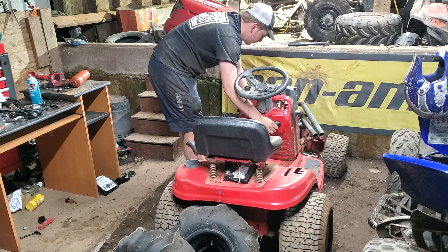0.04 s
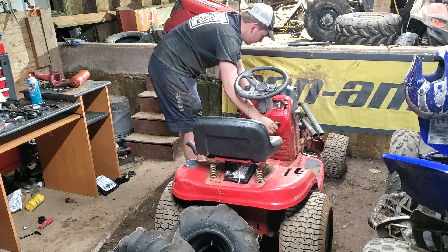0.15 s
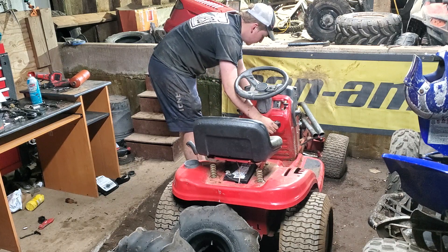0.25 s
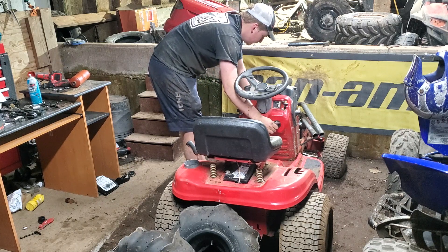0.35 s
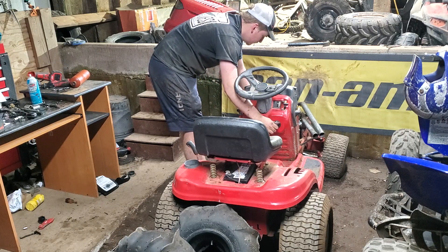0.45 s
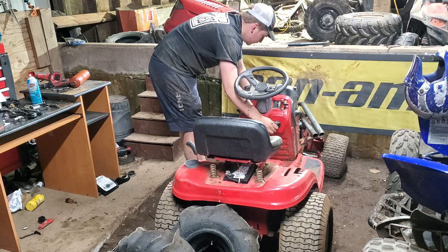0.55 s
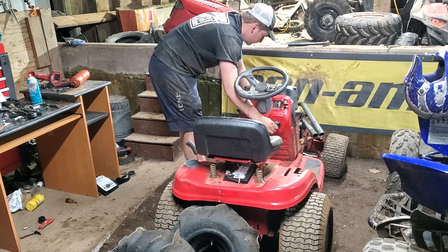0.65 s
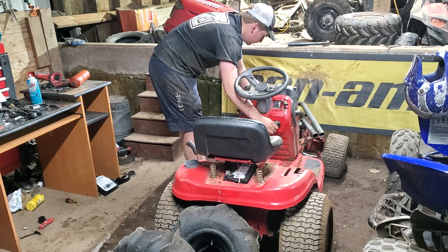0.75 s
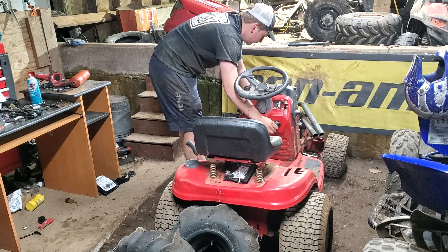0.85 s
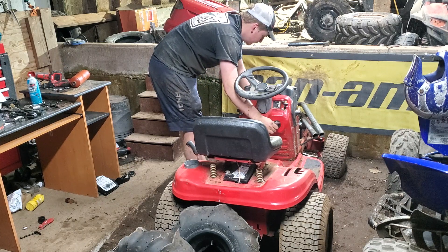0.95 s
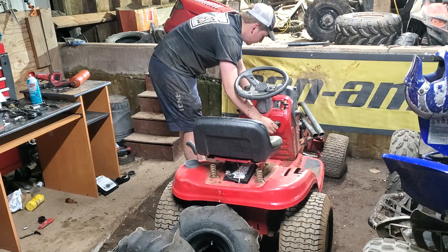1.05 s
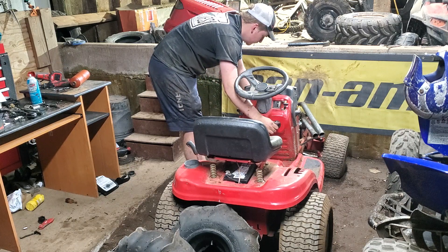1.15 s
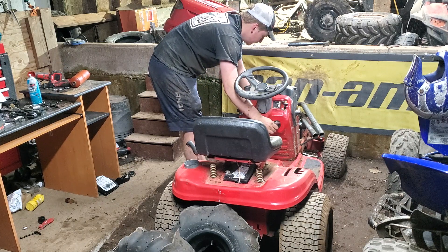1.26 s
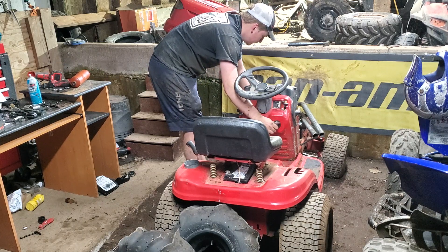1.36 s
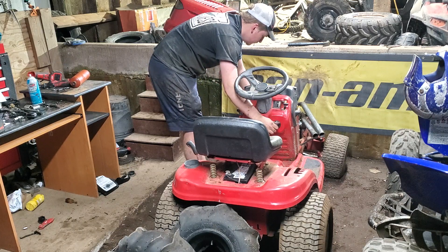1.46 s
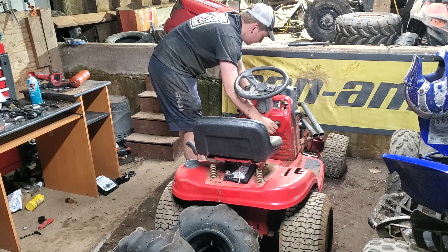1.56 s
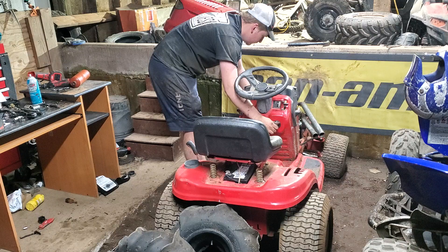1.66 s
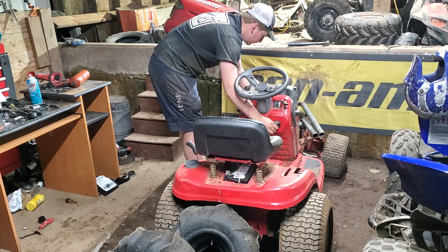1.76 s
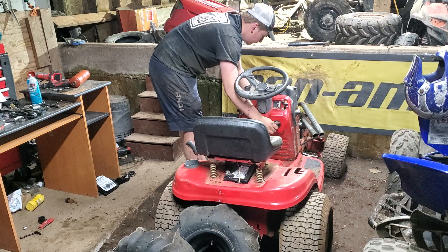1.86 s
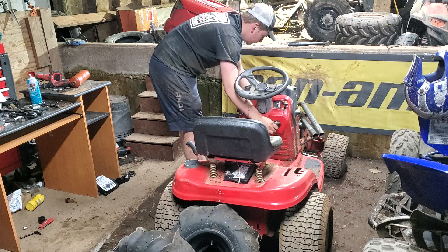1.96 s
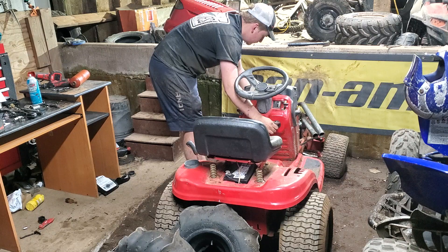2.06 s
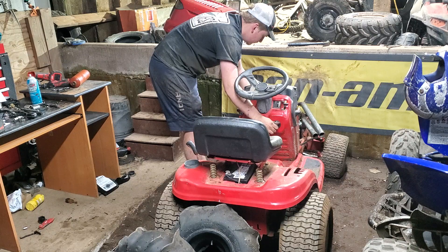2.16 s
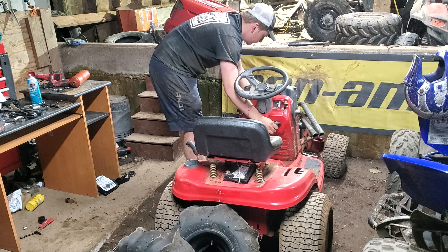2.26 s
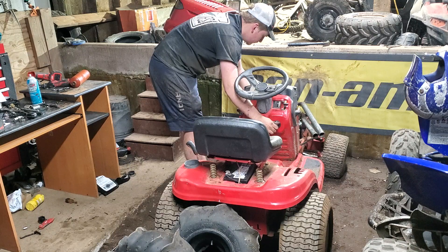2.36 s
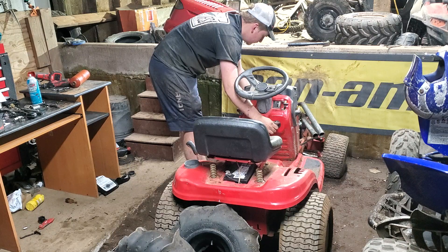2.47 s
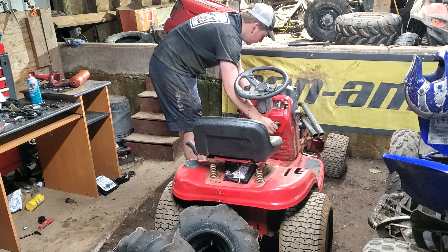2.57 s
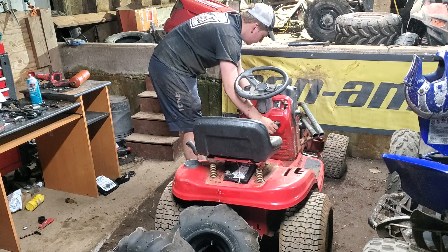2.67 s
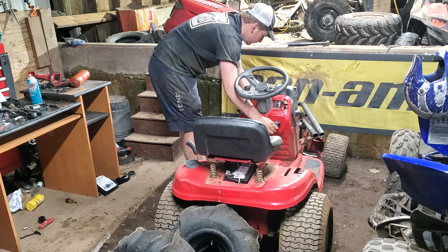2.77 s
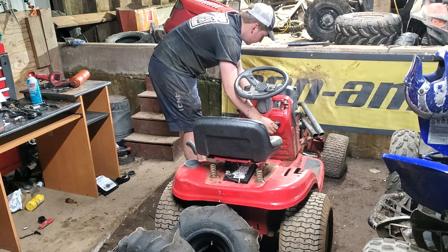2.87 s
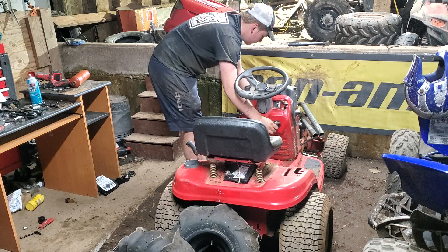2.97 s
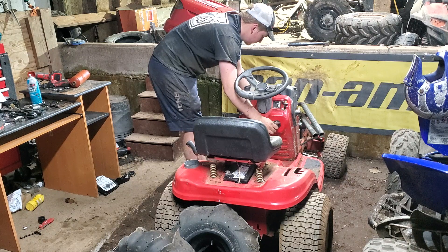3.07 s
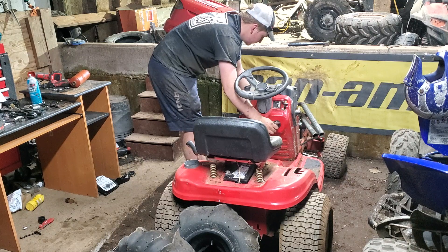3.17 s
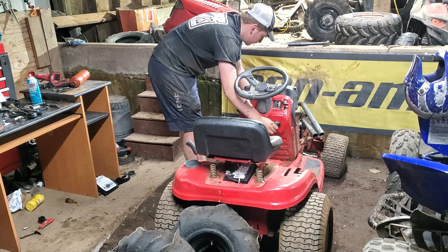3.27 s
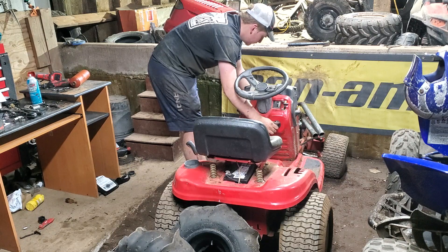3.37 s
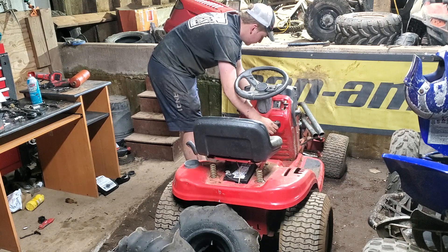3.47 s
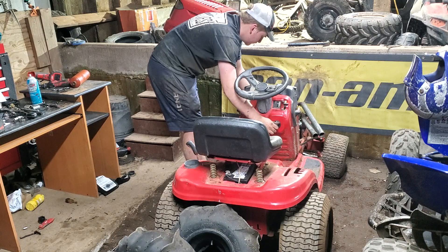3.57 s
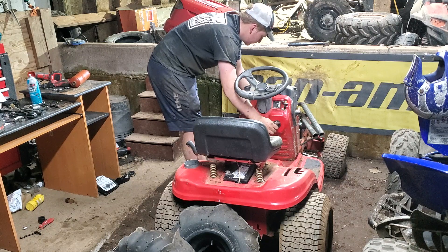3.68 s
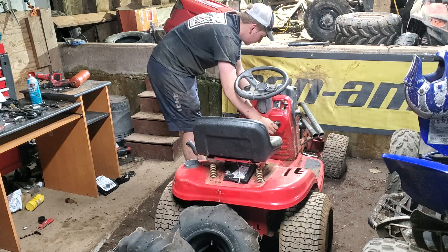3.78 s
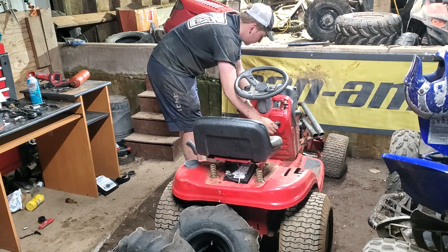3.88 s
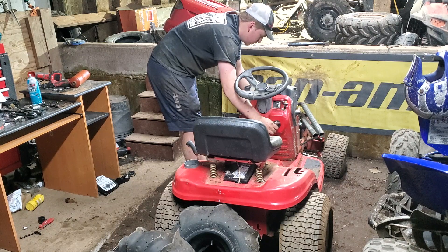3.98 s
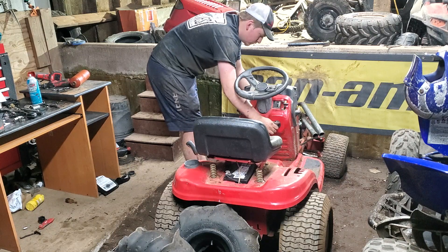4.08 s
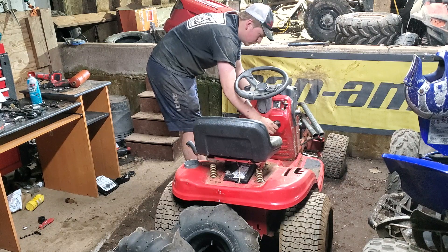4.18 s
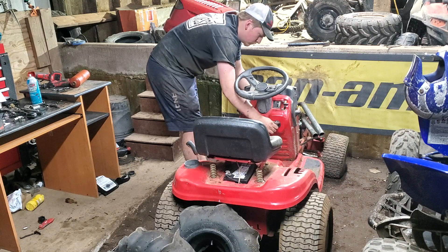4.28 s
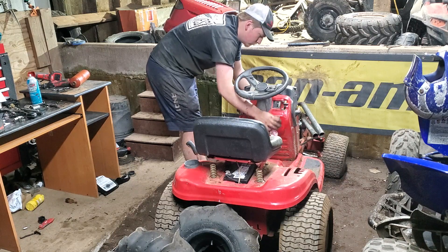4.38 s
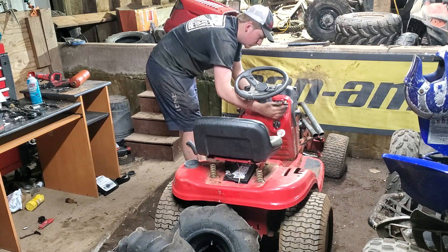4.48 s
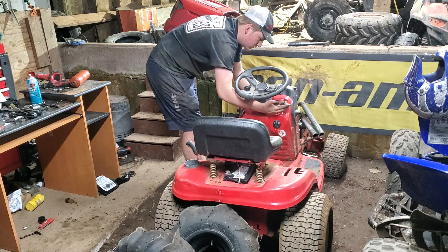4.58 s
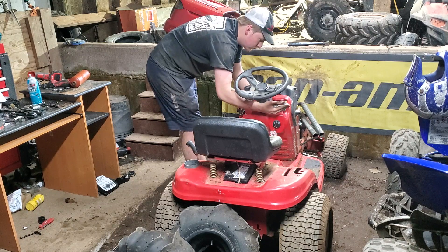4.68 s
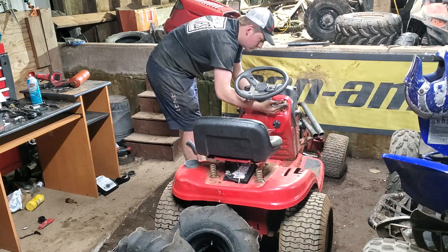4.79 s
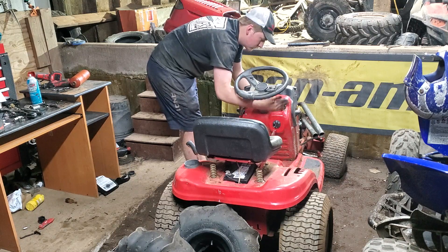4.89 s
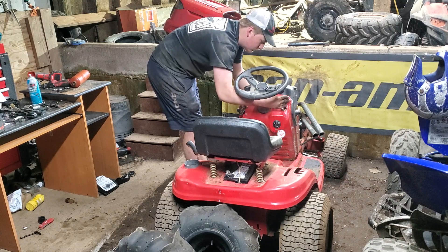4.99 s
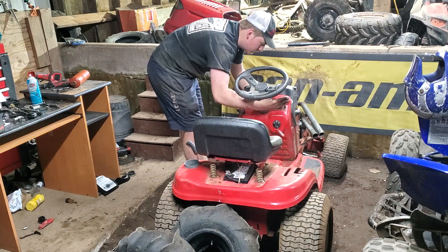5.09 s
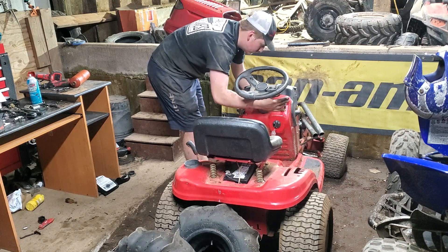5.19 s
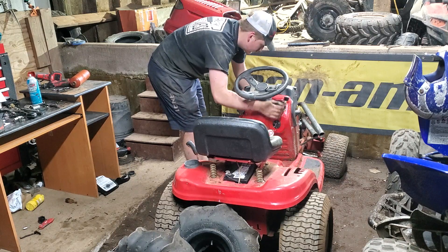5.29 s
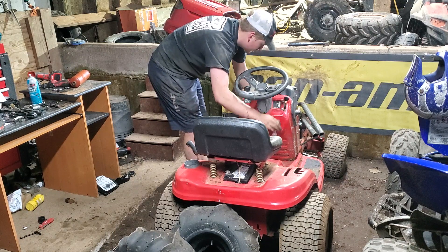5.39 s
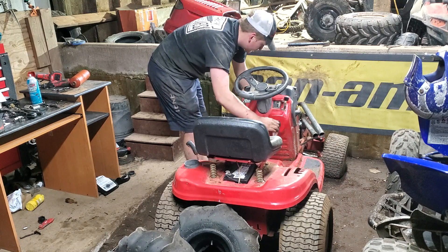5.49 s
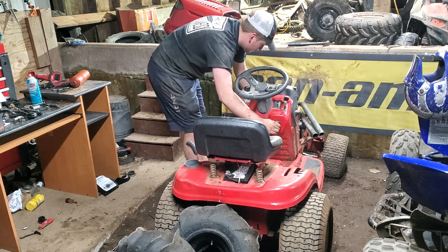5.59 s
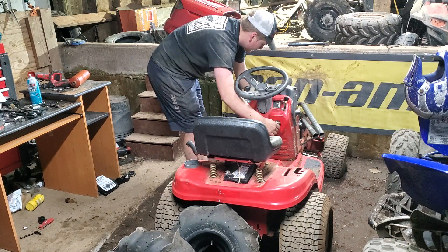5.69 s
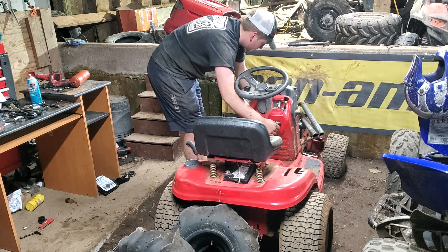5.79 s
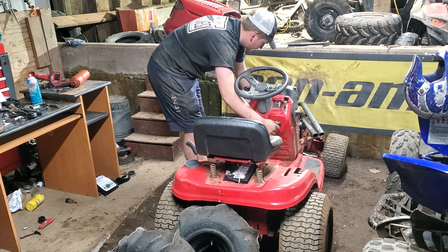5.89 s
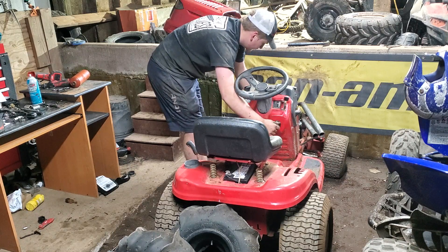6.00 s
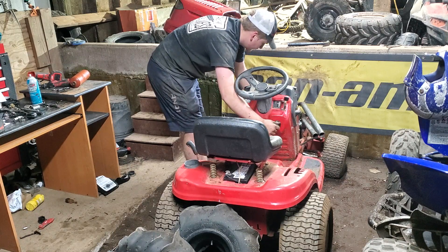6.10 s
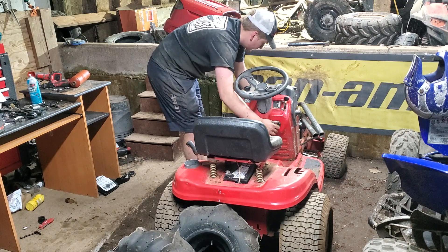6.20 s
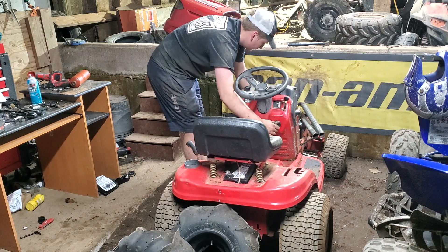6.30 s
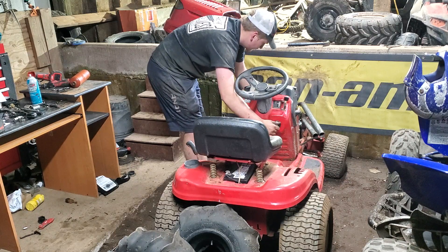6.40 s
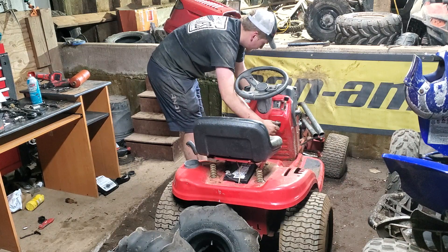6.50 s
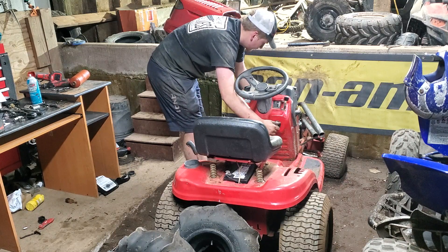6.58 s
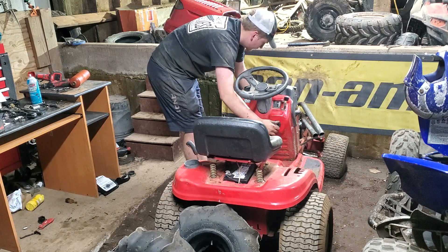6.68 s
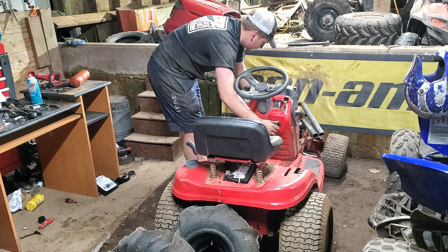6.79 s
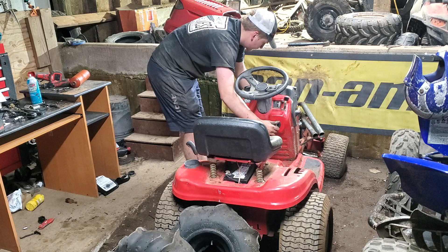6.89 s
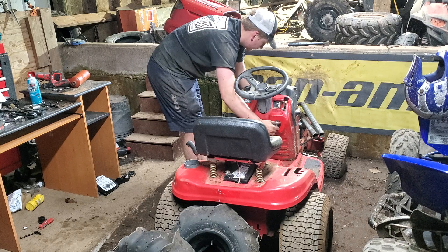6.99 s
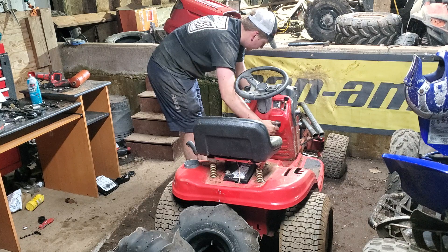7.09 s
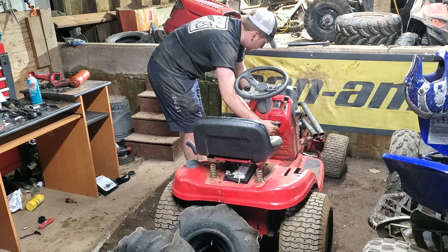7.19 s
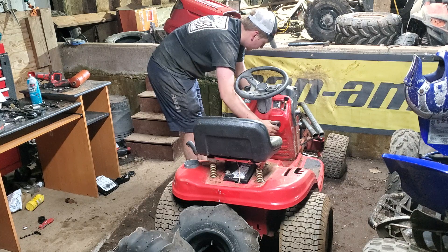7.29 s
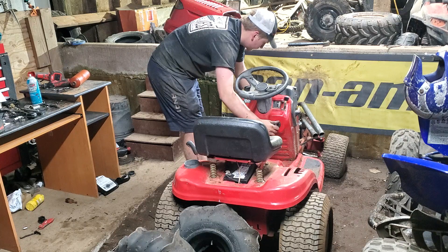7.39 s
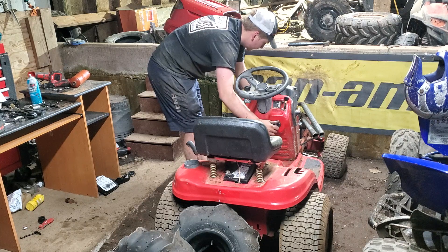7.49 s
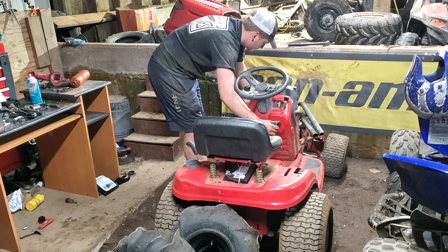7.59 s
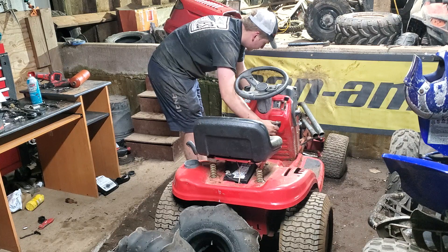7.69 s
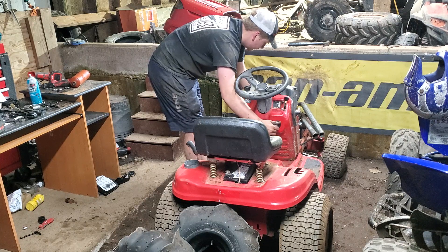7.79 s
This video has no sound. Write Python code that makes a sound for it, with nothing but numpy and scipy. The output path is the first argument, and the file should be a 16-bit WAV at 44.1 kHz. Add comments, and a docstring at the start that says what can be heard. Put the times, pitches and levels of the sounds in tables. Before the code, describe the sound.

From 0 s an electric starter cranks a ride-on mower's single-cylinder engine in a workshop. A rough, wobbling whine near 950 Hz and gritty metallic grinding surge about 5.5 times a second, dipping as the gear runs free, with a low thump and a tiny spit of air at each exhaust stroke. Sharp pops crack at about 0.5 and 0.7 s, with faint ones at 0.9 and 1.8 s. Cranking slows slightly around 2.9 s, then recovers; short sagging intake honks pulse from 3.2 to 4.4 s. The starter is released at 4.4 s and the grind falls away quickly into short wheezes, small clinks and dull knocks, the strongest at 5.1 s. Airy, hissy exhaust coughs follow at 5.6 (faint), 5.75, 6.25, 6.45, 6.75, 7.1, 7.35 and 7.8 s, over a very faint steady background. Stereo microphones catch a short, diffuse room ring.

```python
"""In a workshop, an electric starter cranks the single-cylinder engine of a ride-on mower.
Its gear whines (wobbling tones) and grinds (tooth strikes and noise that ring the casing).
The exhaust thumps once a cycle (pushes into low modes), the intake honks (short sagging tones),
and charges pop, two loudly and two faintly (noise bursts and rings), but the engine will not run.
The starter is let go, the crank rocks to rest, and the exhaust coughs airily (bursts of hiss)."""
import sys
import numpy as np
from scipy import signal
from scipy.fft import rfft, irfft, next_fast_len
from scipy.io import wavfile

SR = 44100
rng = np.random.default_rng(int(sys.argv[2]) if len(sys.argv) > 2 else 0)


def put_to_file(sound):
    """Save the sound as 16-bit audio at rate SR, in the file named by the first command-line argument."""
    columns = np.atleast_2d(sound).T  # one column per channel
    safe = np.clip(columns, -1, 1)
    whole_steps = np.round(safe * 32767)
    wavfile.write(sys.argv[1], SR, whole_steps.astype(np.int16))


N = 346175
TIME = np.arange(N) / SR

# Levels in the tables are starting levels, before the mixing and the room.
# cranking speed, one engine cycle being two turns of the crank: time_s, speed_cycles_per_s
CRANK_SPEED = [(0.0, 5.549), (0.2, 5.605), (0.73, 6.03), (0.9, 5.633), (1.63, 5.399), (1.87, 5.466),
               (2.92, 5.212), (3.62, 5.466), (4.4, 5.517), (4.96, 0.0)]
# how often the teeth of the starter gear meet: time_s, mesh_hz
MESH_RATE = [(0, 993), (.5, 982), (.62, 1003), (.87, 1018), (1.1, 985), (1.35, 945), (1.65, 935),
             (2.1, 960), (2.4, 938), (2.85, 915), (3.2, 932), (3.7, 968), (4.4, 974)]
# one engine cycle, from the exhaust stroke on: share_of_cycle, relative_speed, gear_load_db
CYCLE = [(0, 1.0, 6), (.12, 1.0, 6), (.25, 1.0, 3), (.38, 1.0, -2), (.56, 1.0, 5.5), (.71, 1.018, 6.5),
         (.78, .99, -2), (.83, .86, 0.5), (.91, .84, -2), (.96, .99, 2.5), (1, 1.0, 5)]
# panels that the whine sets ringing: pitch_hz, width_hz, level_db
PANELS = [(942, 18, 0.5), (990, 13, 2.5)]
# rough bands of gear noise that move with the mesh: multiple_of_mesh, half_width_hz, level_db
GEAR_BANDS = [(1.73, 35, -20), (1.87, 35, -14.5), (2.78, 60, -18), (2.98, 60, -15), (3.9, 150, -18)]
# ringing of the engine casing and covers: pitch_hz, width_hz, relative_level_db
CASING = [(631.7, 10, 0.5), (703, 34, -1), (815, 15, 2.5), (900, 8.6, 8.5), (940, 5.7, 7), (1140, 20, -10),
          (1240, 18, -17), (1271, 25, 3.5), (1602, 28, -2.5), (1704, 28, -4), (1793, 28, -1.5),
          (1920, 42, -12.5), (2660, 50, -7), (2886, 50, -6.5)]
# exhaust thump, with the low modes of the workshop: pitch_hz, level_db, t60_s (time to fall 60 dB)
THUMP_MODES = [(94, 2, 0.13), (66, -12, .37), (104.2, -5, 0.45), (112, -10, 0.52)]
# times when the throttle is held open: start_s, end_s
THROTTLE_OPEN = [(0.05, 0.2), (1.85, 2.0), (3.15, 4.6)]
# charges that fire in the exhaust: start_s, crack_db, boom_db, stroke_boost_db, ring_hz, ring_db
POPS = [(0.535, -10, -16.5, 9, 3900, -29), (0.707, -14.5, -28, 7, 3550, -22),
        (0.875, -23.5, -40.5, 1.7, 3550, -42), (1.784, -32.5, -46, 1.5, 3550, -46)]
# shell of the muffler, struck by a pop: pitch_hz, width_hz, relative_level_db
MUFFLER_SHELL = [(1250, 120, 5.5), (1790, 50, -1.5), (2060, 95, -3.5), (3120, 40, -3.5), (5800, 110, -3),
                 (6600, 110, -2)]
# coughs of the exhaust: start_s, length_s, hiss_db, low_body_db, ring_hz, ring_db
COUGHS = [(5.584, 0.049, -48, -56.5, 3490, -60), (5.747, 0.065, -37.5, -34.5, 1720, -54),
          (6.245, 0.062, -41, -41, 1700, -45), (6.454, 0.029, -37, -36.5, 4100, -53),
          (6.745, 0.033, -40, -40, 5030, -54), (7.074, 0.036, -40.3, -36, 4420, -59),
          (7.355, 0.034, -38, -33, 4040, -50), (7.797, .06, -37.3, -35.5, 3450, -44)]
# ringing of the exhaust pipe in a cough: pitch_hz, width_hz, level_db
PIPE = [(890, 30, -7), (1290, 30, -4), (1600, 30, -5), (1780, 6.2, 2), (2900, 90, -6), (3950, 58, -4),
        (5300, 30, 2)]
# air wheezing past the valves as the crank rocks to rest: start_s, length_s, level_db
WHEEZES = [(4.43, 0.093, -37.5), (4.587, 0.016, -40.5), (4.645, 0.05, -50), (4.798, 0.046, -48.5),
           (4.932, 0.12, -52.5)]
# dull knocks as the machine settles: start_s, length_s, level_db
KNOCKS = [(4.819, 0.021, -49), (4.928, 0.019, -50.5), (5.077, 0.052, -38.8)]
# loose metal that clinks as the crank rocks to rest: start_s, pitch_hz, level_db
RATTLES = [(4.592, 6630, -40), (4.655, 1900, -46), (4.807, 3450, -44), (4.835, 2150, -50),
           (5.008, 2870, -47), (5.018, 3400, -51)]
# tone colour of the grinding gears: pitch_hz, level_db (per Hz)
GRIND_COLOUR = [(25, -55), (70, -14), (170, -10.5), (400, -9), (520, -7), (750, -6.5), (1100, -1.5),
                (1450, -5.5), (1800, -7), (2300, -7), (2850, -8), (3400, -8), (4000, -9.5), (6500, -17.5),
                (7600, -28.5), (10500, -26.5), (12500, -29.5), (16000, -35.5)]
# tone colour of the crack of a pop: pitch_hz, level_db (per Hz)
CRACK_COLOUR = [(30, -36), (150, -12.5), (1200, -3), (2000, -0.5), (3800, 7), (4700, -4), (6700, -5),
                (7800, -19), (11000, -10.5), (16000, -16)]
# tone colour of the boom of a pop: pitch_hz, level_db (per Hz)
BOOM_COLOUR = [(30, -40.5), (200, -15), (420, -7.5), (620, -2), (750, -2), (1000, -9.5), (3000, -28.5),
               (16000, -59.5)]
# tone colour of the hiss of a cough: pitch_hz, level_db (per Hz)
HISS_COLOUR = [(30, -50), (130, -13), (300, -15), (500, -1), (950, 2), (1150, -2), (1700, 0.5),
               (2200, -5.5), (2900, -5.5), (3500, -7), (4100, -9.5), (4600, -10.5), (6300, -18.5),
               (8000, -36.5), (11000, -31), (16000, -41)]
# tone colour of the low body of a cough: pitch_hz, level_db (per Hz)
BODY_COLOUR = [(25, -55), (90, -15.5), (170, -12.5), (330, 0.5), (520, -3), (800, -6.5), (1300, -8),
               (2000, -16.5), (4000, -44), (9000, -43), (16000, -56)]
# tone colour of the air at the valves: pitch_hz, level_db (per Hz)
WHEEZE_COLOUR = [(30, -32.5), (300, 7), (900, 2.5), (1500, -3), (3200, 1), (4500, -4), (6500, -13.5),
                 (7700, -22), (11000, -13), (16000, -22.5)]
# tone colour of the knocks: pitch_hz, level_db (per Hz)
KNOCK_COLOUR = [(30, -26), (110, -5), (220, -3), (340, 1), (550, -8), (800, -15), (1500, -22), (4000, -35),
                (16000, -73)]
# tone colour of the steady background noise: pitch_hz, level_db (per Hz)
FLOOR_COLOUR = [(25, -1), (60, 10), (110, 5.5), (250, -5), (800, -7), (1600, -14), (4000, -20.5),
                (7000, -33.5), (16000, -22.5)]
# how long the workshop rings: pitch_hz, t60_s
ROOM_T60 = [(100, 0.9), (300, 0.45), (800, 0.5), (1800, 0.4), (5000, 0.32), (13000, 0.21)]
# difference between the microphones: pitch_hz, left_minus_right_db
MIC_BALANCE = [(60, 1), (110, 1.5), (200, -0.5), (380, -1), (700, -3), (1290, 0.5), (2380, 1.5),
               (4400, 2.5), (8120, -4.5), (15000, -11.5)]

FIRST_STROKE_S, USUAL_CYCLES_PER_S, TEETH_PER_CYCLE = 0.0035, 5.5, 176
# the starter is let go; the faint noise of the coasting valve gear holds a little longer
RELEASE_S, COAST_END_S = 4.41, 5.05
# whine at the usual speed before load and panels, gain per extra cycle per second, fall after release
WHINE_DB, WHINE_SPEED_DB, WHINE_FALL_S = -36, 9.5, 0.051
# grinding at the usual speed before load, its fall, and the valve gear noise lying under it
GRIND_DB, GRIND_FALL_S, COAST_DB, COAST_FALL_S = -27.2, 0.056, -63, 0.036
# the harder the starter labours, the more its gears grind: gain for each cycle per second lost
LABOUR_DB = 3
# exhaust stroke at the usual speed; its strength follows speed to this power
STROKE_DB, STROKE_SPEED_POWER = -20.5, 0.5
# an intake gulp: its point in the cycle, level at the usual speed before honk and rasp, power of speed
GULP_SHARE, GULP_DB, GULP_SPEED_POWER = 0.74, -29, 1.5
# longer coughs sizzle more: level at the usual length, gain per second longer
SIZZLE_DB, SIZZLE_DB_PER_S, USUAL_COUGH_S = -63.5, 380, 0.05
# the low body of a cough comes a moment after its hiss
BODY_LAG_S = 0.0176
# hollow resonance of the muffler, sounded by the body of a cough
MUFFLER_HZ, MUFFLER_WIDTH_HZ, MUFFLER_DB = 343, 45, -11
# after the last knock the chassis shudders softly, each shudder a little louder than the one before
SHUDDER_AFTER_S, SHUDDER_EVERY_S, SHUDDER_S, SHUDDER_DB, SHUDDER_GAIN_DB = 0.18, 0.078, 0.016, -60, 2
FLOOR_DB, MIC_SPACING_M, CUTOFF_HZ = -72, 0.13, 15900


def gear_whine(teeth, load_db, second_db=-9, third_db=-13, wobble=.4, backlash=.65, flicker_db=3):
    """The mesh tone, rough from an off-centre pinion and tooth play, flares as it crosses panel modes."""
    level_db = WHINE_DB + WHINE_SPEED_DB * (starter_speed() - USUAL_CYCLES_PER_S)
    mesh_angle = 2 * np.pi * teeth
    pinion = mesh_angle / 16  # 16 teeth to a turn
    angle = mesh_angle + wobble * np.sin(pinion) + backlash * drift(49)
    tone = np.sin(angle)
    tone = tone + from_db(second_db) * np.sin(2 * angle) + from_db(third_db) * np.sin(3 * angle)
    tone = rms_one(tone * (1 + wobble * np.cos(pinion)) * from_db(flicker_db * drift(22)))
    tone = tone + ringing(tone, PANELS)
    return tone * from_db(level_db + load_db) * gate(0, RELEASE_S, WHINE_FALL_S, 0.0013)


def grinding(teeth, load_db, uneven_db=5.5, rub=.5, load_share=0.55, ring_db=5, rattle_db=2.0):
    """Every tooth strikes with its own force and rubs; the casing rings and rattles with it."""
    driven_db = GRIND_DB + LABOUR_DB * (USUAL_CYCLES_PER_S - starter_speed())
    driven = from_db(driven_db) * gate(0, RELEASE_S, GRIND_FALL_S, .001)
    coasting = from_db(COAST_DB) * gate(0, COAST_END_S, COAST_FALL_S, .001)

    tooth_meets = np.diff(np.floor(teeth), prepend=0)
    tooth_force = from_db(uneven_db * np.clip(rng.standard_normal(N), -2, 2))
    strikes = tooth_meets * tooth_force * rng.choice([-1, 1], N)
    bands = sum(from_db(db) * narrow_noise(multiple * teeth, half_width)
                for multiple, half_width, db in GEAR_BANDS)
    force = rms_one(strikes) + rub * rng.standard_normal(N) + bands
    force = force * from_db(rattle_db * drift(40))
    rings = from_db(ring_db) * ringing(force, CASING)
    # the load sways the grinding less than the whine
    return colour(force + rings, GRIND_COLOUR) * (driven + coasting) * from_db(load_share * load_db)


def exhaust(opening_s=0.01, lag_s=0.0023, low_cut_hz=50):
    """The valve lets out a soft push of air that sets the low modes swinging."""
    pushes = np.zeros(N)
    for start_s, db in exhaust_strokes():
        pushes[int(max(start_s + lag_s, 0) * SR)] = from_db(db)
    age = TIME[:SR // 2]
    swing = sum(from_db(db) * np.sin(2 * np.pi * hz * age) * np.exp(-np.log(1000) * age / t60)
                for hz, db, t60 in THUMP_MODES)
    opening = np.sin(np.pi * np.minimum(age / opening_s, 1)) ** 2
    thump = signal.fftconvolve(swing, opening / opening.sum())
    return filtered(-signal.fftconvolve(pushes, thump)[:N], low_cut_hz, "high", order=6)


def wall_echo(x, delay_s=.048, db=-15):
    """The far wall throws the thump back."""
    return x + from_db(db) * np.interp(TIME - delay_s, TIME, x, left=0)


def intake(honk_hz=262, sag=0.13, length_s=0.04, honk_db=1, rasp_db=0.5, rasp_hz=760,
           rasp_width_hz=320, lead_s=0.0084, flutter=0.28):
    """Each gulp sounds the inlet tract, sagging in pitch around honk_hz, with a rasp of rushing air."""
    honk, flow = np.zeros(N), np.zeros(N)
    for start_s, db in gulps():
        age = TIME - start_s + lead_s
        on = (age > 0) & (age < length_s)
        stroke = age[on] / length_s
        flow[on] = from_db(db) * np.sin(np.pi * stroke)
        honk[on] = flow[on] * np.sin(2 * np.pi * honk_hz * age[on] * (1 + sag * (1 - stroke)))
    rasp = rms_one(resonance(rng.standard_normal(N), rasp_hz, rasp_width_hz))
    return from_db(honk_db) * honk * (1 + flutter * drift(90)) + from_db(rasp_db) * flow * rasp


def pops(crack_fall_s=0.0047, crack_rise_s=0.001, boom_s=0.0064, boom_fall_s=0.013, boom_rise_s=0.0016,
         shock_db=-4, shock_lag_s=.003, ring_s=.008, ring_fall_s=.016, ring_half_width_hz=170):
    """A burning charge cracks and booms; its shock strikes the muffler, and the pipe rings on brightly."""
    crack, boom, shell, rings = 0, 0, 0, 0
    for start_s, crack_db, boom_db, _, ring_hz, ring_db in POPS:
        shock_s = start_s + shock_lag_s
        crack = crack + from_db(crack_db) * gate(start_s, crack_fall_s, crack_fall_s, crack_rise_s)
        boom = boom + from_db(boom_db) * gate(start_s, boom_s, boom_fall_s, boom_rise_s)
        for hz, width, db in MUFFLER_SHELL:
            shell = shell + ping(shock_s, hz, crack_db + shock_db + db, 1 / (np.pi * width))
        ring_gate = gate(shock_s, ring_s, ring_fall_s, crack_rise_s)
        rings = rings + from_db(ring_db) * ring_gate * np.sin(2 * np.pi * ring_hz * TIME)
    bursts = crack * noise(CRACK_COLOUR) + boom * noise(BOOM_COLOUR)
    return bursts + .5 * shell + rings * drift(ring_half_width_hz)


def coughs(chiff_hz=2820, chiff_half_width_hz=110, chiff_db=-7, chiff_s=0.012,
           ring_half_width_hz=110, ring_fall_s=0.026, turbulence_db=1.5):
    """A chiff opens a hiss that rings in the pipe; a hollow body, a sizzle and a pitched ring join in."""
    hiss, body, sizzle, chiff, own_ring = 0, 0, 0, 0, 0
    flutter = drift(ring_half_width_hz)
    for start_s, length, hiss_db, body_db, ring_hz, ring_db in COUGHS:
        sizzle_db = SIZZLE_DB + SIZZLE_DB_PER_S * (length - USUAL_COUGH_S)
        late = gate(start_s + BODY_LAG_S, length - BODY_LAG_S, 0.027, 0.0053)
        ring_gate = gate(start_s, length, ring_fall_s, 0.013)
        hiss = hiss + from_db(hiss_db) * gate(start_s, length, 0.017, 0.0038)
        chiff = chiff + from_db(hiss_db + chiff_db) * gate(start_s, chiff_s, 0.0092, 0.0023)
        own_ring = own_ring + from_db(ring_db) * ring_gate * np.sin(2 * np.pi * ring_hz * TIME)
        body = body + from_db(body_db) * late
        sizzle = sizzle + from_db(sizzle_db) * late
    hiss = hiss * noise(HISS_COLOUR) * from_db(turbulence_db * drift(70))
    rings = ringing(hiss, PIPE) + own_ring * flutter
    bright = rms_one(filtered(rng.standard_normal(N), 8000, "high"))
    body = body * noise(BODY_COLOUR)
    hollow = from_db(MUFFLER_DB) * resonance(body, MUFFLER_HZ, MUFFLER_WIDTH_HZ)
    chiff = chiff * narrow_noise(TIME * chiff_hz, chiff_half_width_hz)
    return hiss + rings + body + hollow + sizzle * bright + chiff


def valve_air(spit_db=-25.5, spit_s=0.0086, spit_hz=5000):
    """Air spits brightly at every exhaust stroke, and wheezes slowly once the starter is let go."""
    spits = sum(from_db(db + spit_db) * gate(s, spit_s, .008, .004) for s, db in exhaust_strokes())
    wheezes = sum(from_db(db) * gate(s, length, 0.017, 0.0056) for s, length, db in WHEEZES)
    air = noise(WHEEZE_COLOUR)
    return wheezes * air + spits * filtered(air, spit_hz, "high")


def knocks(count=2, fall_s=0.019, knock_rise_s=0.0015, shudder_rise_s=0.012):
    """Dull, short knocks as the machine settles, the last a heavy thud as the piston kicks back, and softer
    shudders after it."""
    blows = sum(from_db(db) * gate(s, length, fall_s, knock_rise_s) for s, length, db in KNOCKS)
    first_s = KNOCKS[-1][0] + SHUDDER_AFTER_S
    shudders = 0
    for k in range(count):
        shape = gate(first_s + k * SHUDDER_EVERY_S, SHUDDER_S, fall_s, shudder_rise_s)
        shudders = shudders + from_db(SHUDDER_DB + k * SHUDDER_GAIN_DB) * shape
    return noise(KNOCK_COLOUR) * (blows + shudders)


def rattles(count=3, loss_db=3, fall_s=.0035):
    """Each loose piece clinks a few times as it bounces, weaker and at a slightly different pitch."""
    clinks = 0
    for start_s, hz, db in RATTLES:
        for k in range(count):
            bounce_s = start_s + k * rng.uniform(0.00688, 0.00731)
            pitch_hz = hz * (1 + rng.uniform(-0.0712, 0.08))
            clinks = clinks + ping(bounce_s, pitch_hz, db - k * loss_db, fall_s)
    return clinks


def crank():
    """Speed in cycles per second, and the cycles turned since the first exhaust stroke."""
    per_s, = along(CRANK_SPEED, TIME)
    return per_s, np.cumsum(per_s) / SR - per_s[0] * FIRST_STROKE_S


def starter_speed():
    """Starter speed in engine cycles per second; it keeps its last value while the gear sound fades."""
    mesh_hz, = along(MESH_RATE, TIME)
    return mesh_hz / TEETH_PER_CYCLE


def starter_gear():
    """Teeth passed and gear load: in each cycle the gear labours against compression, then runs free."""
    _, cycles = crank()
    relative_speed, load_db = along(CYCLE, cycles % 1)
    return np.cumsum(TEETH_PER_CYCLE * starter_speed() * relative_speed) / SR, load_db


def once_a_cycle(share, db, speed_power):
    """Rows (start_s, level_db) when the crank passes a point of its cycle; a slower crank is weaker."""
    per_s, cycles = crank()
    at = np.flatnonzero(np.diff(np.floor(cycles - share)) > 0)
    speed_db = speed_power * 20 * np.log10(per_s[at] / USUAL_CYCLES_PER_S)
    return np.column_stack([TIME[at], db + speed_db])


def exhaust_strokes():
    """Rows (start_s, level_db): one stroke a cycle, harder when a charge fires in it."""
    strokes = once_a_cycle(0, STROKE_DB, STROKE_SPEED_POWER)
    for start_s, _, _, boost_db, *_ in POPS:
        strokes[np.argmin(abs(strokes[:, 0] - start_s)), 1] += boost_db
    return strokes


def gulps():
    """Rows (start_s, level_db): the intake strokes that find the throttle open."""
    strokes = once_a_cycle(GULP_SHARE, GULP_DB, GULP_SPEED_POWER)
    return [(s, db) for s, db in strokes if any(start < s < end for start, end in THROTTLE_OPEN)]


def from_db(db):
    """Turn decibels into a plain gain."""
    return 10 ** (np.asarray(db) / 20)


def rms_one(x):
    """Scale a signal to an average strength (rms) of 1."""
    return x / np.sqrt(np.mean(x ** 2) + 1e-20)


def along(rows, x):
    """Each further column of a table, read at x of the first column."""
    key, *columns = np.transpose(rows)
    return [np.interp(x, key, c) for c in columns]


def at_hz(points, hz):
    """Read a table at these frequencies, on a logarithmic pitch scale."""
    key, value = np.transpose(points)
    return np.interp(np.log(hz + 1), np.log(key), value)


def filtered(x, hz, kind, order=2):
    """Keep the part of a sound above, below or between cutoffs."""
    return signal.sosfilt(signal.butter(order, hz, kind, fs=SR, output="sos"), x)


def colour(x, spectrum):
    """Give a steady signal a spectrum; rms 1."""
    size = next_fast_len(N)
    gain = from_db(at_hz(spectrum, np.fft.rfftfreq(size, 1 / SR)))
    return rms_one(irfft(rfft(x, size) * gain, size)[:N])


def noise(spectrum):
    """Steady random noise with a tone colour; rms 1."""
    return colour(rng.standard_normal(N), spectrum)


def drift(rate_hz):
    """Smooth random wandering, rms 1; the filter gets a second to settle first."""
    return rms_one(filtered(rng.standard_normal(N + SR), rate_hz, "low")[SR:])


def narrow_noise(turns, half_width_hz):
    """A narrow band of noise around a pitch, given as turns of phase; rms about 1."""
    in_step = drift(half_width_hz) * np.cos(2 * np.pi * turns)
    return in_step + drift(half_width_hz) * np.sin(2 * np.pi * turns)


def resonance(x, hz, width_hz):
    """One ringing mode: a two-pole band-pass with a gain of about 1 at its peak."""
    r = np.exp(-np.pi * width_hz / SR)
    feedback = [1, -2 * r * np.cos(2 * np.pi * hz / SR), r * r]
    return signal.lfilter(np.array([1, 0, -1]) * (1 - r * r) / 2, feedback, x)


def ringing(x, modes):
    """All the modes of a part, set ringing together by x."""
    return sum(from_db(db) * resonance(x, hz, width) for hz, width, db in modes)


def ping(start_s, hz, db, fall_s):
    """One metal mode, struck and dying away."""
    out, start = np.zeros(N), int(start_s * SR)
    age = TIME[:min(SR // 3, N - start)]
    out[start:start + len(age)] = from_db(db) * np.sin(2 * np.pi * hz * age) * np.exp(-age / fall_s)
    return out


def gate(start_s, hold_s, fall_s, rise_s):
    """A loudness shape that opens, holds (counted from its start) and dies away."""
    age = np.maximum(TIME - start_s, 0)
    return np.minimum(age / rise_s, 1) * np.exp(-np.clip((age - hold_s) / fall_s, 0, 20))


def machine(source, wet_db, count):
    """Different parts of the machine radiate on their own, each by its own paths through the room."""
    return sum(workshop(source(), wet_db) for _ in range(count)) / np.sqrt(count)


def workshop(x, wet_db):
    """Direct sound, slightly earlier on the right, and a diffuse tail alike in both ears only in the bass."""
    age = TIME[:SR * 3 // 4]
    edges = np.geomspace(45, 18000, 15)
    white, tail = rng.standard_normal((2, 2, len(age))), 0
    for k, (low, high) in enumerate(zip(edges, edges[1:])):
        hz = np.sqrt(low * high)
        mid, side = filtered(white[k % 2], [low, high], "band")
        alike = np.sinc(2 * hz * MIC_SPACING_M / 343)  # sound travels 343 m/s
        band = np.sqrt(1 + alike) * mid + np.sqrt(1 - alike) * side * [[1], [-1]]
        band = band * np.minimum(age / 0.0042, 1)
        band = band * np.exp(-np.log(1000) * age / at_hz(ROOM_T60, hz))
        tail = tail + rms_one(band) * np.sqrt(2 * (high - low) / SR / len(age))
    direct = np.stack([np.pad(x, (5, 0))[:N], x])  # left is 5 samples late
    wet = from_db(wet_db)
    return (direct + wet * signal.fftconvolve(x[None], tail, axes=1)[:, :N]) / np.sqrt(1 + wet ** 2)


def background():
    """A faint steady noise, separate in each ear."""
    return from_db(FLOOR_DB) * np.stack([noise(FLOOR_COLOUR), noise(FLOOR_COLOUR)])


def scene():
    """Add up the starter, the exhaust and intake, the small noises and the background."""
    teeth, load_db = starter_gear()
    whine = machine(lambda: gear_whine(teeth, load_db), wet_db=0.0, count=2)
    grind = machine(lambda: grinding(teeth, load_db), wet_db=4.5, count=2)
    breathing = wall_echo(exhaust()) + workshop(intake(), wet_db=-5.0)
    small_noises = workshop(valve_air() + knocks() + rattles(), wet_db=0)
    bangs = machine(pops, wet_db=-5, count=2) * from_db([[-1], [1]])  # leaning to the right
    airy_coughs = machine(coughs, wet_db=1.5, count=2)
    return whine + grind + breathing + small_noises + bangs + airy_coughs + background()


def record(dry):
    """The two microphones differ in colour, peaks are rounded, and the top is cut steeply."""
    size = next_fast_len(N + SR // 10)
    lean_db = at_hz(MIC_BALANCE, np.fft.rfftfreq(size, 1 / SR)) * [[.5], [-.5]]
    heard = irfft(rfft(dry, size) * from_db(lean_db), size)[:, :N]
    rounded = .8 * np.tanh(heard / .8)
    return signal.sosfilt(signal.ellip(12, .2, 80, CUTOFF_HZ, fs=SR, output="sos"), rounded)


dry = scene()
out = record(dry)
put_to_file(out)
```